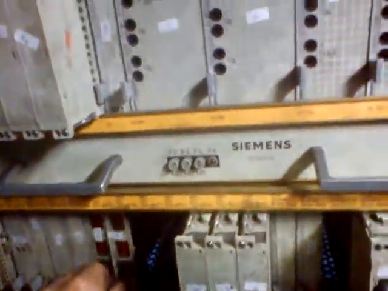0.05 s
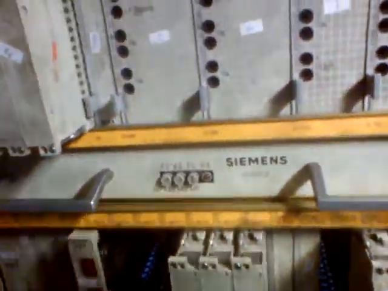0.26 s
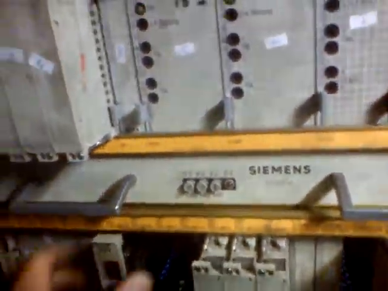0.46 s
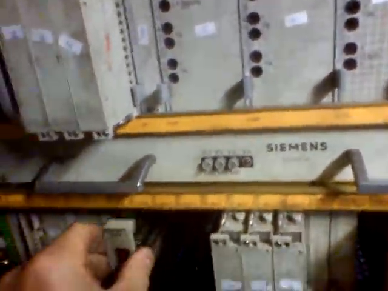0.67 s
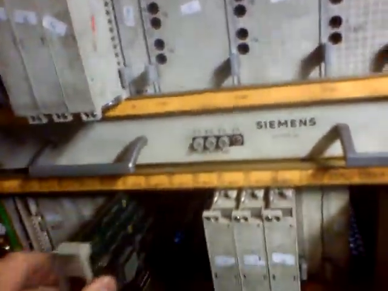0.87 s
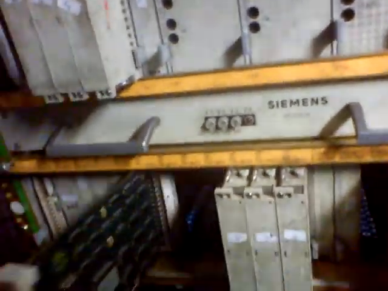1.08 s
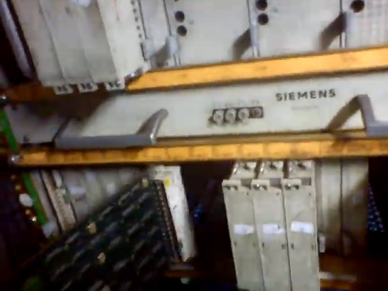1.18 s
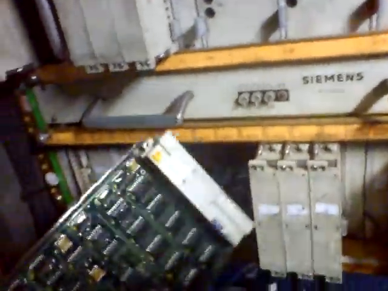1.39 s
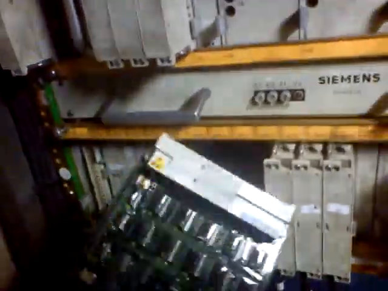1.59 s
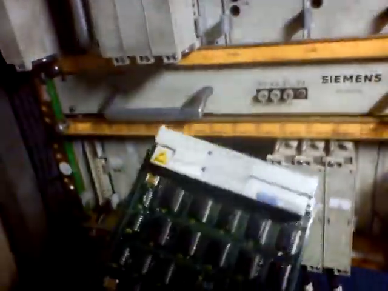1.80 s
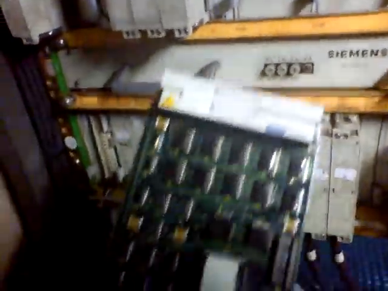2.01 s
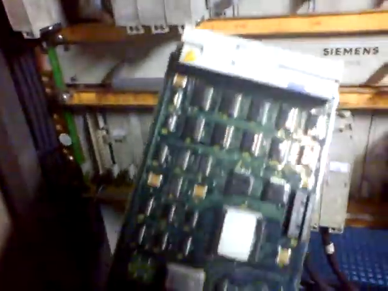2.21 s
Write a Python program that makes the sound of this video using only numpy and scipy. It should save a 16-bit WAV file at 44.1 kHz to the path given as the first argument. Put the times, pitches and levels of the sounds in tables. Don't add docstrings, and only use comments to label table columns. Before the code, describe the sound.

Circuit card unlatched and pulled from a metal rack with harsh clattering over a fan hum

```python
import sys
import numpy as np
from scipy import signal
from scipy.fft import rfft, irfft
from scipy.io import wavfile
from scipy.ndimage import uniform_filter1d, map_coordinates

SR = 44100
rng = np.random.default_rng(int(sys.argv[2]) if len(sys.argv) > 2 else 0)


def invert_db(level):
    return 10 ** (np.asarray(level, dtype=float) / 20)


def transcribe(signal):
    frames = np.atleast_2d(signal).T
    limited = np.clip(frames, -1, 1)
    pcm = np.round(limited * 32767).astype(np.int16)
    wavfile.write(sys.argv[1], SR, pcm)


N = 99225


def unit(x):
    return x / np.sqrt(np.mean(x ** 2) + 1e-20)


def peak(x):
    return x / np.abs(x).max()


def along(points, hz):
    f, v = np.transpose(points)
    return np.interp(np.log(hz + 1), np.log(f + 1), v)


def curve(rows):
    return np.interp(np.arange(N) / SR, *np.transpose(rows))


def wobble(rate):
    knots = rng.standard_normal(int(N * rate / SR) + 4)
    return map_coordinates(knots, [np.arange(N) * rate / SR])


def filtered(x, points):
    return irfft(rfft(x) * invert_db(along(points, np.fft.rfftfreq(N, 1 / SR))), N)


def ring(modes, extra_db, phase, t):
    hz, db, t60 = np.transpose(modes)[:, :, None]
    decay = invert_db(db + extra_db[:, None] - 60 * t / t60)
    waves = decay * np.sin(2 * np.pi * (hz * t + phase[:, None]))
    rise_s = 0.0002
    return waves.sum(axis=0) * (1 - np.exp(-t / rise_s))


# start_s, level_db (peak), pitch_hz (favoured), low_knock_db, chatter_s
LATCH_BLOWS = [(.2107, 0.5, 1900, -26.5, 0.00311), (.2185, 0, 1825, -22, .001),
               (.2215, -1.5, 1815, -18, .002), (.2265, -7, 1815, -25.5, .003),
               (.2295, -3.5, 2270, -17, .003), (.234, 3, 3320, -24, .003), (.238, 3, 2830, -9, .006),
               (.243, 2, 1815, -17.5, 0.0017), (.2465, 1.5, 3097, -19.5, .003),
               (.251, -0.5, 2270, -21.5, .005), (.256, 2.5, 2970, -9, .003), (.26, 2.5, 1815, -17, 0.0053),
               (.2635, 4.5, 1719, -11.5, .004), (.271, 3, 2270, -9.5, 0.0044), (.2755, -1, 3488, -12, .003),
               (.28, 0.5, 2830, -16, .003), (.284, 8.5, 2970, -17.5, .005), (.292, 5, 2970, -20, .004),
               (.299, -7, 1950, -16, .003), (.304, 5, 2420, -14.5, .004), (.3105, -6, 2830, -19.5, .002),
               (.3145, -2, 1950, -19, 0.0045), (.3205, -6, 1950, -12.5, .002), (.324, 1, 1950, -17, .002),
               (.3365, -0.5, 2420, -19, 0.0016), (.3468, 0.5, 1815, -22.5, 0.0022),
               (.352, -2, 2970, -22, .002), (.359, 1.5, 2970, -24.5, 0.0053),
               (.365, -4.5, 3320, -10.5, .005), (.377, -4.5, 3320, -25, .004),
               (.386, -6.5, 2055, -19.5, 0.0018), (.399, -12.5, 2270, -7, 0.0026),
               (.406, -15.5, 2620, -21.5, .002), (.4175, -9, 2970, -24.5, .003),
               (.4255, -18.5, 2420, -15, 0.0023)]
GUIDE_KNOCKS = [(.4606, -25, 1950, -14.5, 0.0022), (.4731, -9, 3320, -11, 0.0023),
                (.488, -25, 1340, -33, 0.0027), (.5205, -13, 3320, -19.5, 0.0035),
                (.6806, -4.5, 2270, -15, 0.00093), (.7385, -5.5, 2620, -16, 0.00064),
                (.7445, -13.5, 1815, -29, 0.009), (.806, -14, 917, 5.5, 0.0028),
                (.794, -13.5, 2055, -16.5, 0.0015), (.8025, -6.5, 1340, -8.5, .004),
                (.809, -7, 1950, -0.5, 0.0035), (.835, -19, 2055, -14.5, 0.0019),
                (.8602, -15.5, 1815, -28.5, 0.0024), (.8717, -16, 2270, -27.5, 0.0026),
                (.877, -6.5, 2620, -26.5, .005), (.885, -7, 1815, -12, 0.012),
                (.9161, -12.5, 2270, -7.5, 0.0086), (.932, -10.5, 1950, -21.5, 0.0025),
                (.9405, -1.5, 2620, -8, 0.0019), (.9435, -9, 1719, -19.5, .002),
                (.9505, -5.5, 1815, -8.5, .0015), (.962, -9.5, 370, 6, .015)]
CLEARING_BLOWS = [(1.0115, -5, 2620, -20, .0004), (1.0125, -.5, 2055, -20, .0002),
                  (1.007, -16, 1950, -15, .003), (1.0175, -11, 2620, -20, .002),
                  (1.0195, -6, 2055, -20, .002), (1.0235, -8, 2055, -20, .003),
                  (1.029, -11, 1950, -20, .002), (1.0335, -10, 2270, -20, .003),
                  (1.039, -10, 2970, -20, .004), (1.0435, -10, 3320, -20, .003),
                  (1.05, -11, 2270, -20, .004), (1.1305, -13, 2420, -20, .002),
                  (1.14, -16, 2420, -20, .003), (1.1645, -20, 2270, -20, .004),
                  (1.1805, -10, 2055, -12, .007), (1.19, -12, 2970, -15, .005),
                  (1.2104, -4, 2270, -20, .002), (1.217, -9, 2270, -20, .004),
                  (1.2245, -10, 2055, -20, .003), (1.2357, -3.5, 1815, -20, .0015),
                  (1.244, -12, 3320, -20, .003), (1.2495, -7, 2420, -20, .002),
                  (1.2515, 1, 2420, -24, .0004), (1.2575, 0, 2055, -24, .0008),
                  (1.264, -6, 2055, -24, .002), (1.2785, -8, 2970, -15, .005),
                  (1.286, -12, 2970, -20, .008), (1.3065, -11, 3480, -20, .003),
                  (1.316, -17, 2270, -20, .008)]
# pitch_hz, level_db, t60_s
RACK_MODES = [(1340, -9, 0.069), (1719, -6, 0.025), (1815, 4, 0.034), (1950, 6, 0.025), (2055, 1.5, 0.026),
              (2270, 4, 0.029), (2420, 3, 0.027), (2620, -1, 0.019), (2830, -11.5, 0.036),
              (2970, -4.5, 0.039), (3097, -4.5, 0.012), (3320, -2, 0.019), (3488, -2.5, 0.03),
              (3790, -6, 0.0064)]
BOARD_MODES = [(370, -9, 0.062), (520, -7.5, .015), (734, -0.5, 0.014), (917, -1, 0.014), (1150, -4, 0.011)]
CONTACT_SNAP = [(1900, 6, .003), (2800, 15, 0.0037), (3650, -6, 0.0026)]


def contacts(rows):
    favour_db, favour_octaves = 12.5, .11
    scatter_db = 2
    detune = .012
    chatter_db = 7
    out, t = np.zeros(N + SR), np.arange(SR // 8) / SR
    split = len(RACK_MODES)
    mode_hz = np.transpose(RACK_MODES + BOARD_MODES)[0]
    for start_s, level_db, pitch_hz, low_knock_db, chatter_s in rows:
        octaves = np.log2(mode_hz / pitch_hz)
        favour = favour_db * np.exp(-(octaves / favour_octaves) ** 2)
        extra_db = favour + scatter_db * rng.standard_normal(len(mode_hz))
        phase = rng.random(len(mode_hz))

        shifts = 1 + detune * rng.uniform(-1, 1, split)
        seated = [(hz * shift, db, t60) for (hz, db, t60), shift in zip(RACK_MODES, shifts)]
        metal = ring(seated, extra_db[:split], phase[:split], t)
        snaps = len(CONTACT_SNAP)
        metal = metal + ring(CONTACT_SNAP, np.zeros(snaps), phase[:snaps], t)
        board = ring(BOARD_MODES, extra_db[split:], phase[split:], t)

        grit = rng.standard_normal((2, len(t))).prod(axis=0) * np.exp(-t / chatter_s)
        push = invert_db(chatter_db) * grit / np.linalg.norm(grit)
        push[0] = 1
        hit = signal.fftconvolve(push, peak(metal) + invert_db(low_knock_db) * peak(board))[:len(t)]
        out[round(start_s * SR):][:len(t)] += invert_db(level_db) * peak(hit)
    return out[:N]


# start_s, level_db
DRAG_LEVEL = [(.2, -53), (.23, -7), (.32, -11.5), (.4, -28.5), (.47, -35), (.66, -41), (.75, -34),
              (.82, -27), (.91, -27.5), (.96, -24), (1.0, -28), (1.06, -26), (1.1, -36), (1.175, -43.5),
              (1.19, -18), (1.29, -17.5), (1.35, -61)]
# start_s, level_db (over the rack)
BOARD_FLEX = [(.2, -8.5), (.45, -2.5), (.75, -0.5), (.82, 0.5), (.91, -4), (.97, 4.5), (1.03, -3),
              (1.3, -13.5)]


def grain_ring(slips, modes, t):
    damping = .25
    held = [(hz, db, damping * t60) for hz, db, t60 in modes]
    response = ring(held, np.zeros(len(held)), rng.random(len(held)), t)
    return unit(signal.fftconvolve(slips, response)[:N])


def slide():
    slips_per_s, slip_spread_db, sway_db = 1100, 6, 2
    chance, t = rng.random((3, N)), np.arange(SR // 10) / SR
    happens = chance[0] < slips_per_s / SR
    size = invert_db(-slip_spread_db * np.log(chance[1] + 1e-9) / 3)
    slips = happens * size * np.sign(chance[2] - .5)
    rack = grain_ring(slips, RACK_MODES + CONTACT_SNAP, t)
    board = grain_ring(slips, BOARD_MODES, t)
    level = invert_db(curve(DRAG_LEVEL) + sway_db * wobble(45))
    return level * (rack + invert_db(curve(BOARD_FLEX)) * board)


# pitch_hz, t60_s
CABINET_DECAY = [(300, 0.12), (2000, 0.13), (4000, 0.17)]


def cabinet(x):
    hz, t, z = signal.stft(rng.standard_normal(SR // 3), SR, nperseg=256)
    decay = invert_db(-60 * t / along(CABINET_DECAY, hz)[:, None])
    tail = signal.istft(z * decay, SR, nperseg=256)[1]
    delayed = np.pad(x, (100, 0))
    return signal.fftconvolve(delayed, tail / np.linalg.norm(tail))[:N]


# start_s, level_db
FAN_DUCKING = [
    (0.0, -27.5),
    (0.17, -25.5),
    (0.32, -27.5),
    (0.39, -39.5),
    (0.61, -35.5),
    (0.81, -31.5),
    (1.0, -34),
    (1.21, -33.5),
    (1.7, -28.5),
    (2.25, -27),
]
# pitch_hz, level_db (per Hz)
FAN_AIR = [(30, -26.5), (140, -7.5), (310, -6.5), (700, -13.5), (1000, -16), (3000, -26), (3900, -36),
           (4900, -61.5)]
# shaft_multiple, level_db (over the air)
SHAFT_ORDERS = [(3, -13), (4, -12), (5, -24), (6, -15), (7, -6.5), (8, -20), (9, -22), (11, -18)]


def fans():
    patchy_db, sway_db, flutter_db = 1.4, .6, 3.5
    shaft_hz, wander = 42.11, 0.0045
    z = signal.stft(rng.standard_normal(N), nperseg=512)[2]
    field = uniform_filter1d(rng.standard_normal(z.shape), 5, 0)
    patches = unit(uniform_filter1d(field, 10, 1))
    noise = signal.istft(z * invert_db(patchy_db * patches), nperseg=512)[1][:N]
    air = unit(filtered(noise, FAN_AIR))

    turn = 2 * np.pi * np.cumsum(shaft_hz * (1 + wander * wobble(6.55))) / SR
    hum = np.zeros(N)
    for multiple, level_db in SHAFT_ORDERS:
        level = invert_db(level_db + 3.5 + flutter_db * wobble(14))
        hum += level * np.sin(multiple * turn + 2 * np.pi * rng.random())
    return invert_db(curve(FAN_DUCKING) + 1.48 + sway_db * wobble(9.2)) * (air + hum)


# pitch_hz, level_db
CARD_RADIATION = [(100, -37.5), (300, -10), (500, -1.5)]


def scene():
    blows = contacts(LATCH_BLOWS) + contacts(GUIDE_KNOCKS) + contacts(CLEARING_BLOWS)
    card = filtered(blows + slide(), CARD_RADIATION)
    return (card + invert_db(-8) * cabinet(card) + fans())[None]


def low_pass(x):
    return signal.sosfilt(signal.butter(12, 16480, fs=SR, output="sos"), x)


# pitch_hz, level_db
MICROPHONE_BAND = [(3300, -1), (3700, -7), (4000, -9.5), (4300, -16), (4700, -42.5), (5000, -120)]


def record(dry):
    clip_level = .71
    clipped = np.clip(filtered(dry, MICROPHONE_BAND), -clip_level, clip_level)
    mix = filtered(clipped, [(16300, 0), (16500, -80)])
    return low_pass(mix)


dry = scene()
out = record(dry)
transcribe(out)
```